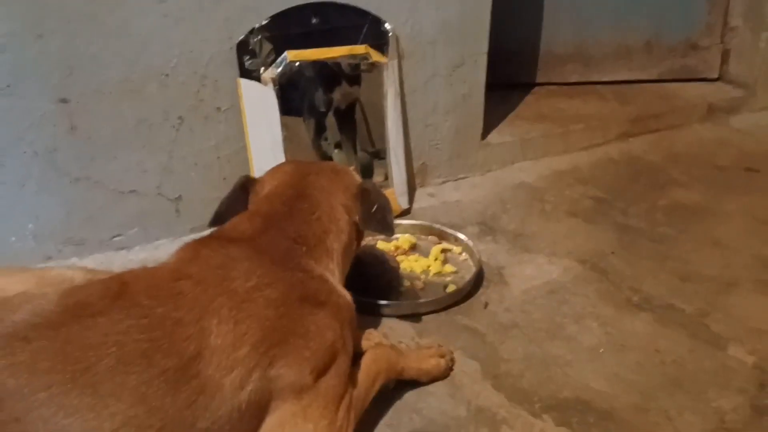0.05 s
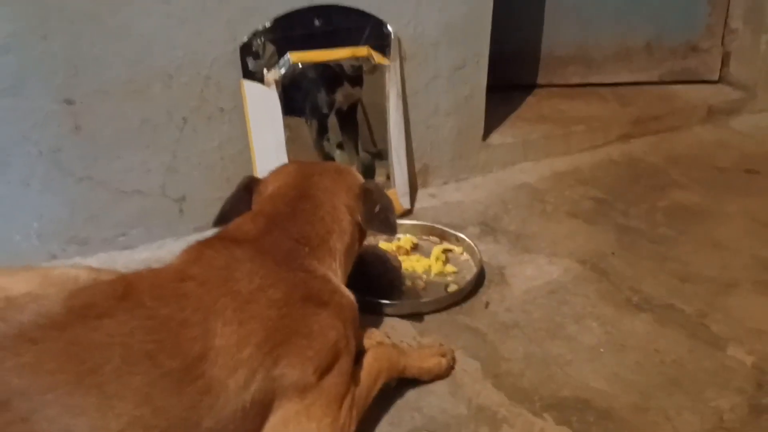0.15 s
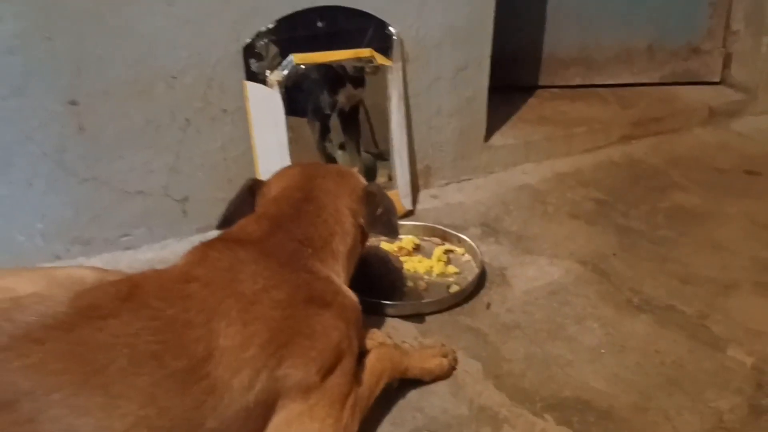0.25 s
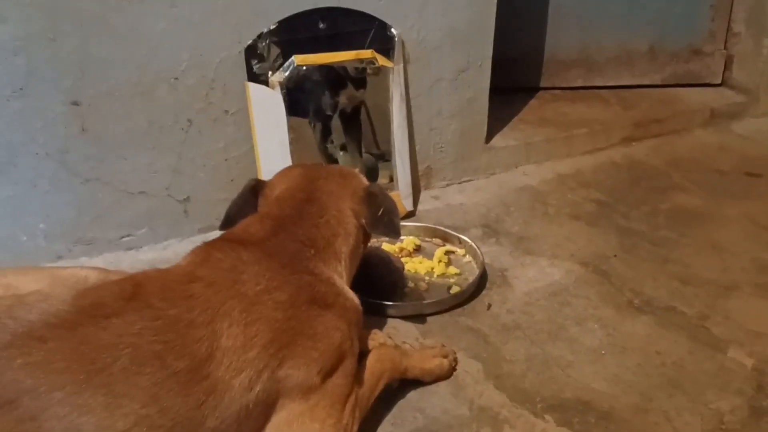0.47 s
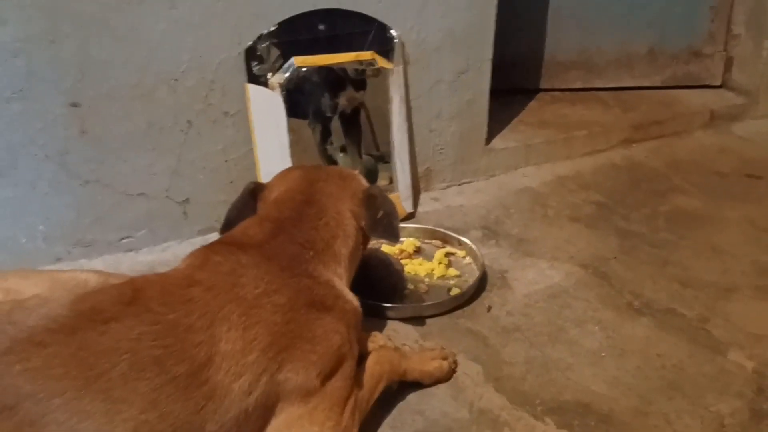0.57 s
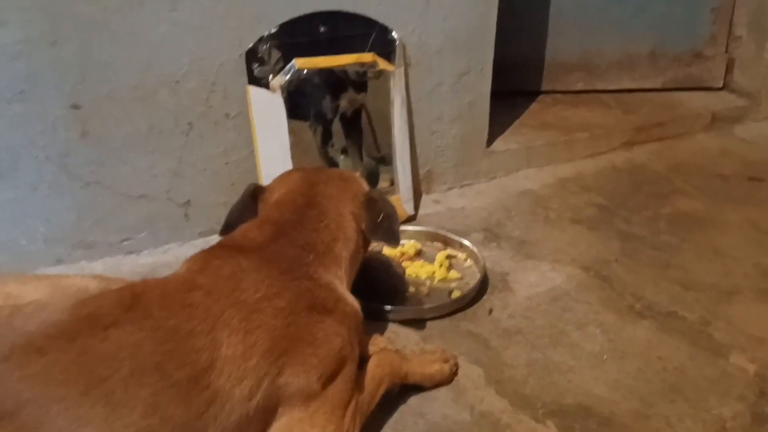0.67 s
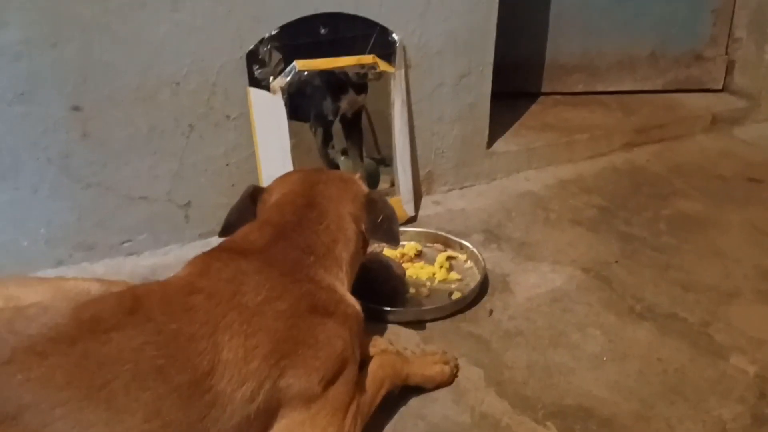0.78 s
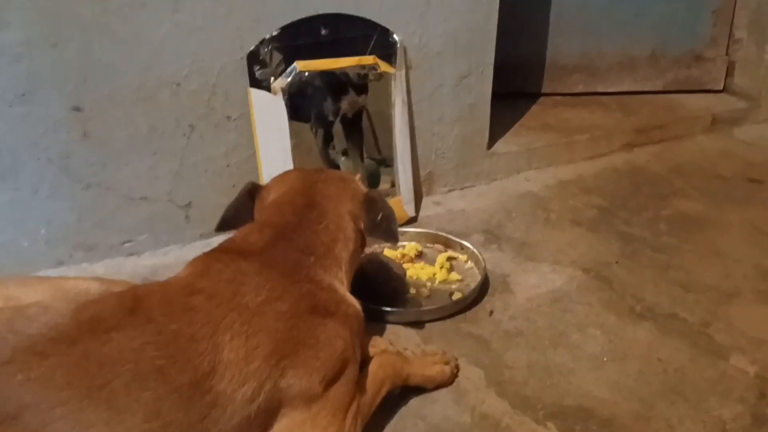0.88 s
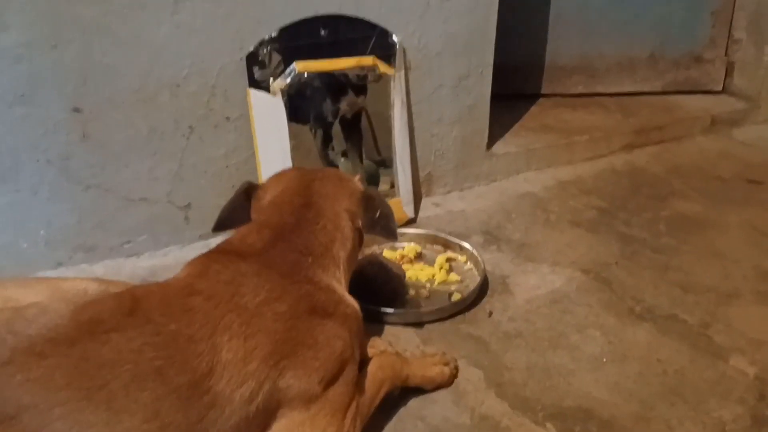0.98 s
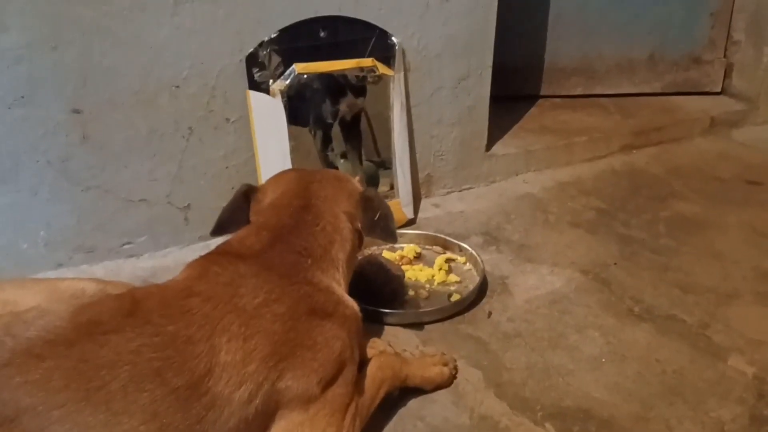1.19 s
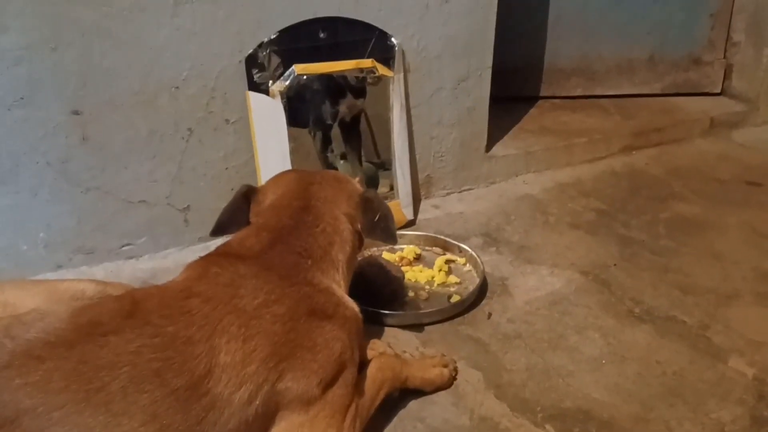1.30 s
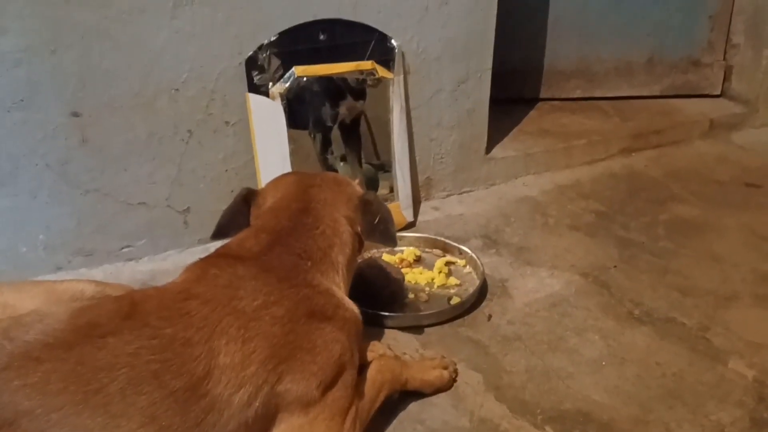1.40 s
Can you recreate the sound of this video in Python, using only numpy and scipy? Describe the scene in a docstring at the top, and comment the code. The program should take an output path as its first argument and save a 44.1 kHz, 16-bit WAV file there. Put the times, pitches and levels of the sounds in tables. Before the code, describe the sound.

Close dog growl: soft lip smacks, a throaty rumble swelling to one snarl, a brief rising whine

```python
"""A dog growls at its reflection in a mirror close by: a rough rumble swells into one open snarl, sinks back
and ends in a short rising whine, after which a thin tone lingers. Pulses and puffs of air ring its throat and
mouth. Soft mouth smacks (ringing pops, then a wet crackle) come first; bands of filtered noise add hiss. A
floor bounce, scatter from things nearby and a faint room tail follow, over quiet background air."""
import sys
import numpy as np
from scipy import signal
from scipy.fft import rfft, irfft
from scipy.io import wavfile
from scipy.ndimage import uniform_filter1d, minimum_filter1d

SR = 44100
rng = np.random.default_rng(int(sys.argv[2]) if len(sys.argv) > 2 else 0)


def store_pcm(level_fs):
    """Save levels as 16-bit WAV."""
    pcm = np.round(np.clip(level_fs, -1, 1) * 32767).astype(np.int16)
    wavfile.write(sys.argv[1], SR, np.atleast_2d(pcm).T)


N = 63945
TIME = np.arange(N) / SR   # seconds

# background air: loudness over time [t/s, level/dB]
BACKGROUND_LEVEL = [(0, -56), (.14, -54.5), (1.3, -62), (1.42, -66)]
# background air: tone colour, relative [f/Hz, level/dB]
BACKGROUND_COLOUR = [(30, -25.5), (70, -17), (130, -8), (240, 4), (400, -17), (620, -14.5), (1000, -26),
                     (2200, -30.5), (4000, -43.5)]

# how the dog's sound leans to the left, before each side takes its share [f/Hz, level/dB]
SIDE_LEAN = [(90, -2.5), (230, -2.5), (480, -6), (700, 5.5), (1200, -5), (2000, -6.5)]
RIGHT_DELAY_S = 0.0001   # the right microphone hears the dog later
BOUNCE_LEFT_S, BOUNCE_RIGHT_S, BOUNCE_DB = 0.00096, .0014, -14   # reflection off the floor
NEAR_DB, NEAR_T60_S = -5.5, 0.1   # scatter from dish, mirror and body; T60 is the time to die by 60 dB
ROOM_DB, ROOM_T60_S, ROOM_CUT_HZ = -14.5, 0.34, 3000
LOW_CUT_HZ, HIGH_CUT_HZ = 47, 15450
CEILING = .85   # limiter, full scale is 1

# mouth smacks: when and how loud each pop peaks [t/s, level/dB]
SMACKS = [(0.049, -41), (0.072, -44.5), (0.082, -32)]
# what a smack rings with [f/Hz, width/Hz, level/dB]
SMACK_MODES = [(170, 130, -3), (610, 60, 3), (1320, 53, -1.5)]
# saliva crackling as the lips peel apart [t/s, level/dB]
WET_LEVEL = [(0.069, -76.5), (0.086, -58.5), (.112, -55.5), (.14, -81.5)]

# bright hiss past the teeth, before each side's gain [t/s, level/dB]
HISS_LEVEL = [(0.136, -87), (0.167, -71.5), (0.439, -71), (0.587, -58), (0.683, -71), (1.18, -74.5)]
# resonances of the bright hiss [f/Hz, width/Hz, level/dB]
HISS_MODES = [(5680, 900, 2), (6960, 1300, 3), (9900, 1100, -5)]
# very high, thin noise, strongest in the snarl, before each side's gain [t/s, level/dB]
TOP_NOISE_LEVEL = [(0.135, -88), (0.257, -83), (0.461, -76), (0.564, -53.5), (0.716, -84)]
# broad lower hiss after the snarl, strongest shortly before the whine, before each side's gain [t/s, level/dB]
LOWER_HISS_LEVEL = [(.6, -102), (.66, -76.5), (.8, -76.5), (.93, -69), (1.05, -75), (1.19, -93)]
HISS_FADE_S = .05

# a faint, thin tone lingers near 230 Hz after the whine
HUM_HZ, HUM_DB, HUM_END_S = 231, -54.5, 1.28

# vocal folds: pitch and roughness over time [t/s, f/Hz, roughness 0-1]
VOICE = [(.15, 99.9, .45), (.22, 106.9, .5), (.28, 116.4, .8), (.36, 125.6, .9), (.45, 117.4, 1),
         (.52, 130.7, 0.8), (.58, 145.6, .65), (.64, 134.1, 0.6), (.69, 123.8, 0.8), (.82, 127.6, 0.8),
         (.89, 125.3, 0.5), (.94, 127, .2), (.98, 138.1, 0.2), (.995, 143.4, .9), (1.004, 202.7, 0.06),
         (1.06, 225.4, 0.03), (1.095, 240.2, .06), (1.11, 280, 0.5), (1.122, 353.3, 0.3),
         (1.15, 326.6, 0.6), (1.17, 221.3, 0.4)]
# a clear voice closes the folds gently, which changes its treble [f/Hz, level/dB]
SOFT_CLOSURE = [(700, 1.5), (900, -10)]
JITTER, SHIMMER_DB = .135, 9   # pitch (share) and loudness unevenness, at full roughness
ONSET_S, ATTACK_S, END_S, FADE_S = .142, 0.0087, 1.182, 0.036
# jaw: how far it opens, which lifts the resonances [t/s, opening 0-1]
JAW = [(.5, 0), (.55, 0.4), (.58, 0.69), (.625, 0.6), (.68, 0.0), (1.09, 0.08), (1.12, 1), (1.15, 0.2),
       (1.172, 0.03)]
WANDER, WANDER_HZ = .03, 10   # tongue and lips: shift as a share of pitch (growl: at full roughness), rate

# level of each band of the growl, before its trim [t/s, level/dB]
RUMBLE_LEVEL = [(0.137, -48.5), (0.177, -36.5), (0.249, -30), (0.485, -32), (0.54, -22.5), (0.573, -36.5),
                (0.82, -36.5), (0.992, -40.5), (1.091, -61.5)]
CHEST_LEVEL = [(0.135, -47.5), (0.161, -30.5), (0.245, -22.5), (0.274, -25), (0.324, -16.5), (0.342, -22),
               (0.418, -17), (0.477, -22.5), (0.519, -16.5), (0.619, -21), (0.775, -25.5), (0.789, -27.5),
               (0.911, -24.5), (0.936, -28), (0.978, -27), (0.997, -33), (1.107, -27.5), (1.142, -32),
               (1.175, -26), (1.19, -35)]
MOUTH_LEVEL = [(0.135, -60.5), (0.155, -43.5), (0.253, -34), (0.3, -36), (0.318, -29.5), (0.346, -38.5),
               (0.379, -27), (0.404, -39.5), (0.422, -26.5), (0.455, -34), (0.537, -20.5), (0.546, -15),
               (0.583, -10), (0.606, -23.5), (0.614, -13), (0.695, -47.5), (0.711, -32), (0.729, -44.5),
               (1.04, -38), (1.095, -40.5), (1.11, -34.5), (1.137, -41.5), (1.161, -36), (1.2, -50.5)]
SNARL_LEVEL = [(0.133, -83), (0.161, -58.5), (0.253, -50.5), (0.262, -46), (0.408, -41), (0.419, -51.5),
               (0.461, -33.5), (0.498, -41), (0.548, -24.5), (0.587, -22.5), (0.615, -29.5), (0.644, -42.5),
               (0.732, -62.5), (1.181, -69.5)]
TEETH_LEVEL = [(0.135, -81.5), (0.161, -45), (0.181, -46), (0.193, -62), (0.219, -45), (0.437, -49),
               (0.51, -44.5), (0.549, -28.5), (0.575, -30), (0.589, -18), (0.602, -34.5), (0.612, -22),
               (0.647, -54), (0.751, -63.5), (1.042, -61), (1.062, -50.5), (1.085, -65), (1.141, -57),
               (1.2, -70)]
RASP_LEVEL = [(0.135, -71), (0.248, -60.5), (0.365, -74.5), (0.391, -57.5), (0.517, -51), (0.567, -52),
              (0.585, -40), (0.647, -56.5), (0.729, -70), (1.165, -71.5)]
# resonances of each band with the jaw shut, relative levels [f/Hz, width/Hz, level/dB]
RUMBLE_MODES = [(115.2, 24, 0)]
CHEST_MODES = [(248, 116, 2), (298, 37, -13)]
MOUTH_MODES = [(449, 33, -2.5), (566, 64.7, 1.5), (617.6, 84.5, -0.5), (870.5, 18, -10), (975.5, 42, -12)]
SNARL_MODES = [(1254, 140, -1), (1364, 150, -4), (1610, 780, -12.5)]
TEETH_MODES = [(1969.4, 36, 5.5), (2345, 200, -11.5), (2638, 110, -8)]
RASP_MODES = [(3374, 270, 5.5), (3644, 220, -2.5)]


def from_db(db):
    """Turn decibels into a gain."""
    return 10 ** (np.asarray(db) / 20)


def rms_one(x):
    """Scale a sound to an average (rms) strength of 1."""
    return x / np.sqrt(np.mean(x ** 2) + 1e-20)


def in_time(rows):
    """Draw straight lines between a table's rows, giving each column at every sample."""
    times, *columns = np.transpose(rows)
    return [np.interp(TIME, times, column) for column in columns]


def colour(x, points, share=1):
    """Change the tone by a share of a frequency curve in dB."""
    hz, db = np.transpose(points)
    f = np.arange(N + 1) * SR / (2 * N)
    curve_db = np.interp(np.log(f + 1), np.log(hz), db)
    spectrum = rfft(x, 2 * N) * from_db(share * curve_db)
    return irfft(spectrum)[..., :N]


def band(x, order, low_hz, high_hz):
    """Keep only the sound between two frequencies."""
    return signal.sosfilt(signal.butter(order, [low_hz, high_hz], "band", fs=SR, output="sos"), x)


def drift(rate_hz):
    """Wander smoothly at random around zero, with spread 1."""
    slow = signal.butter(2, rate_hz, fs=SR, output="sos")
    # the first half lets the filter settle
    return rms_one(signal.sosfilt(slow, rng.standard_normal(2 * N))[N:])


def shaped(x, level, low_hz, high_hz):
    """Keep one band, even out its level, then make it follow a level table."""
    x = band(x, 4, low_hz, min(high_hz, .45 * SR))
    power = uniform_filter1d(uniform_filter1d(x * x, size=700), size=450)
    steady = x / np.sqrt(np.abs(power) + 1e-12)
    return steady * from_db(in_time(level)[0])


def gate(end_s, fade_s):
    """Start the voice quickly and let it die in a smooth fade centred on its end."""
    rising = (TIME - ONSET_S) / ATTACK_S
    falling = .5 + (end_s - TIME) / fade_s
    opening = np.clip(np.minimum(rising, falling), 0, 1)
    return np.sin(np.pi / 2 * opening) ** 2


def resonate(x, modes, stretch=1):
    """Ring side-by-side resonances with alternating signs; stretch moves them all in pitch."""
    out = 0
    clock = np.cumsum(stretch * np.ones(N)) / SR
    for k, (hz, width, db) in enumerate(modes):
        r = np.exp(-np.pi * width / SR)
        turn = np.exp(2j * np.pi * hz * clock)
        # shift the resonance down to 0 Hz, smooth there, shift back up
        smooth = signal.lfilter([1 - r], [1, -r], x / turn + 1e-18)
        out = out + (-1) ** k * from_db(db) * (turn * smooth).real
    return out


def background_air():
    """Coloured noise, partly shared by the two sides, gives quiet background air."""
    air = rng.standard_normal(N) + .5 * rng.standard_normal((2, N))
    return from_db(in_time(BACKGROUND_LEVEL)[0]) * rms_one(colour(air, BACKGROUND_COLOUR))


def diffuse(x, t60_s, low_hz, high_hz):
    """Spread a sound into a dying cloud of echoes, different on each side."""
    tail = rng.standard_normal((2, N)) * from_db(-60 * TIME / t60_s) * (TIME > .002)
    tail /= np.sqrt(np.sum(tail ** 2, axis=1, keepdims=True))
    tail = band(tail, 1, low_hz, high_hz)
    return signal.fftconvolve(x[None], tail, axes=1)[:, :N]


def heard(x, left_s, right_s):
    """Sound takes its own travel time to each of the two microphones."""
    return np.array([np.interp(TIME - delay, TIME, x) for delay in (left_s, right_s)])


def smacks():
    """The lips part with short pops that ring the mouth, then a wet crackle."""
    ring = band(resonate(signal.unit_impulse(N), SMACK_MODES), 2, 110, 1700)
    ring = ring / np.abs(ring).max()
    pops = sum(from_db(db) * np.interp(TIME - start, TIME, ring, left=0) for start, db in SMACKS)
    spiky = rng.laplace(size=N)
    crackle = signal.sosfilt(signal.butter(1, 700, fs=SR, output="sos"), spiky)
    wet = shaped(crackle, WET_LEVEL, low_hz=600, high_hz=3300)
    return pops + wet * (TIME < ONSET_S)


def hiss():
    """Noise hisses bright and thin in the snarl, then broad and lower, strongest shortly before the whine."""
    air = rng.standard_normal((2, N))
    bright = shaped(resonate(air, HISS_MODES), HISS_LEVEL, low_hz=5380, high_hz=10300)
    top_noise = shaped(air, TOP_NOISE_LEVEL, low_hz=11500, high_hz=15000)
    lower = shaped(air, LOWER_HISS_LEVEL, low_hz=2390, high_hz=5230)
    side_gain = from_db([[1], [3.5]])   # left, right
    return (bright + top_noise + lower) * gate(END_S + FADE_S / 2, HISS_FADE_S) * side_gain


def hum():
    """After the whine a faint, thin tone lingers near 230 Hz, almost pure."""
    hz = HUM_HZ * (1 + WANDER * drift(WANDER_HZ))
    tone = np.sqrt(2) * np.sin(2 * np.pi * np.cumsum(hz) / SR)
    # fades in just as the growl fades out
    return from_db(HUM_DB) * tone * (gate(HUM_END_S, FADE_S) - gate(END_S, FADE_S))


def folds():
    """The vocal folds give uneven pulses, softer where the voice is clear, each with a puff of rough air."""
    hz, rough = in_time(VOICE)
    rough = np.clip(rough, 0, 1)
    phase = np.cumsum(hz * np.exp(JITTER * rough * drift(90))) / SR
    cycle = phase.astype(int)
    # one random draw for each swing of the folds
    luck = np.clip(rng.standard_normal(N), -2, 2)[cycle]
    strength = from_db(SHIMMER_DB * rough * luck)
    pulses = np.diff(cycle, prepend=0) * strength
    clear = np.clip(1 - 2 * rough, 0, 1)
    pulses = (1 - clear) * pulses + clear * colour(pulses, SOFT_CLOSURE)
    # the air is strongest right after each pulse
    puff_shape = np.exp(-(phase % 1) / .33) + .35
    puffs = rng.standard_normal(N) * np.sqrt(strength) * puff_shape
    return rms_one(pulses), rms_one(puffs), rough


def register(voice, modes, level, low_hz, high_hz, air, rise, trim_db):
    """Pulses and air ring one group of resonances, which rise with the jaw and wander when rough."""
    pulses, puffs, rough = voice
    air_share = np.clip(air * rough, 0, 1)
    source = np.sqrt(1 - air_share) * pulses + np.sqrt(air_share) * puffs
    stretch = 1 + rise * in_time(JAW)[0] + WANDER * rough * drift(WANDER_HZ)
    return from_db(trim_db) * shaped(resonate(source, modes, stretch), level, low_hz, high_hz)


def growl():
    """One pair of vocal folds drives all bands of the growl, from rumble up to rasp."""
    voice = folds()
    x = (register(voice, RUMBLE_MODES, RUMBLE_LEVEL, low_hz=82, high_hz=162.0, air=0.55, rise=0.17, trim_db=-1.5)
         + register(voice, CHEST_MODES, CHEST_LEVEL, low_hz=156, high_hz=383.7, air=0.5, rise=0.64, trim_db=0)
         + register(voice, MOUTH_MODES, MOUTH_LEVEL, low_hz=477, high_hz=1015, air=0.82, rise=0.02, trim_db=0)
         + register(voice, SNARL_MODES, SNARL_LEVEL, low_hz=1015, high_hz=1780, air=0.76, rise=0.14, trim_db=0.5)
         + register(voice, TEETH_MODES, TEETH_LEVEL, low_hz=1836, high_hz=2803, air=2.4, rise=0.036, trim_db=-1)
         + register(voice, RASP_MODES, RASP_LEVEL, low_hz=2800, high_hz=4400, air=1.7, rise=0.065, trim_db=3))
    return x * gate(END_S, FADE_S)


def scene():
    """Put together the dog, a little to the right, its reflections, the room and background air."""
    dog = growl() + hum() + smacks()
    direct = heard(dog, 0, RIGHT_DELAY_S)
    near = from_db(NEAR_DB) * diffuse(dog, NEAR_T60_S, low_hz=400, high_hz=13490)
    room = from_db(ROOM_DB) * diffuse(dog, ROOM_T60_S, low_hz=91, high_hz=ROOM_CUT_HZ)
    bounce = from_db(BOUNCE_DB) * heard(dog, BOUNCE_LEFT_S, BOUNCE_RIGHT_S)
    left, right = direct + near + room + bounce
    placed = np.array([colour(left, SIDE_LEAN, 0.65), colour(right, SIDE_LEAN, -.5)])
    return placed + hiss() + background_air()


def record(dry):
    """The microphones lose the deep bass, a limiter holds the peaks, the top is cut steeply."""
    x = signal.sosfilt(signal.butter(4, LOW_CUT_HZ, "high", fs=SR, output="sos"), dry)
    peak = np.abs(x).max(axis=0)
    gain = minimum_filter1d(CEILING / np.maximum(peak, CEILING), size=400)
    x = x * uniform_filter1d(uniform_filter1d(gain, size=200), size=200)
    return signal.sosfilt(signal.ellip(10, .1, 80, HIGH_CUT_HZ, fs=SR, output="sos"), x)


dry = scene()
out = record(dry)
store_pcm(out)
```